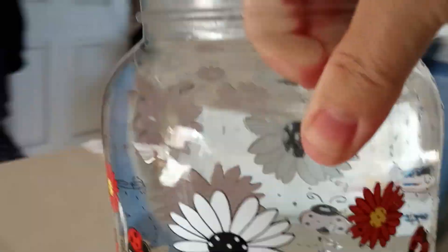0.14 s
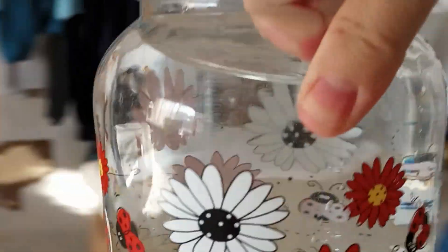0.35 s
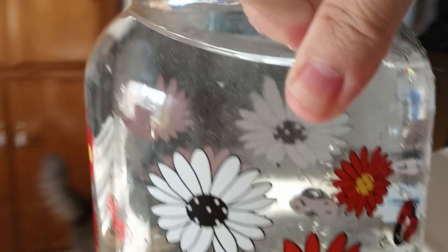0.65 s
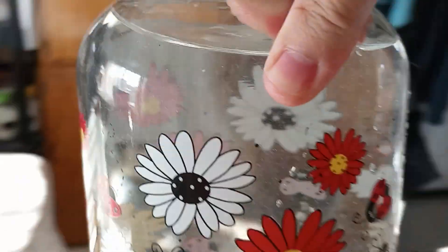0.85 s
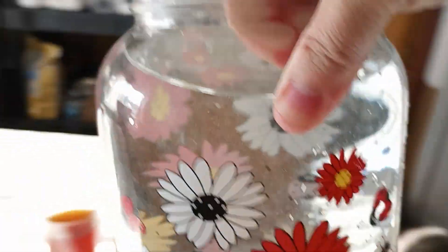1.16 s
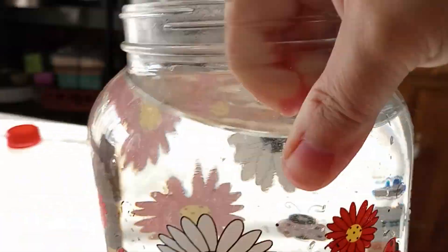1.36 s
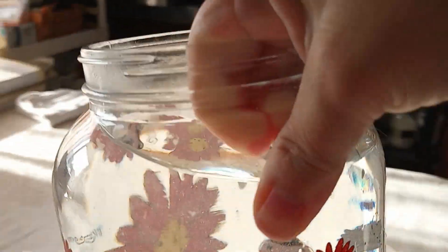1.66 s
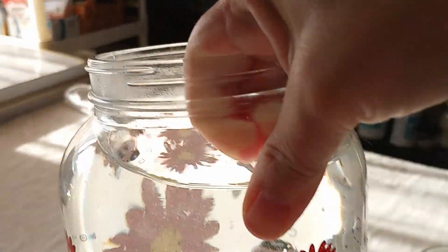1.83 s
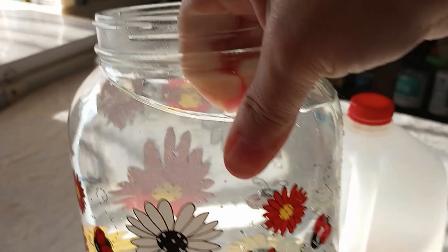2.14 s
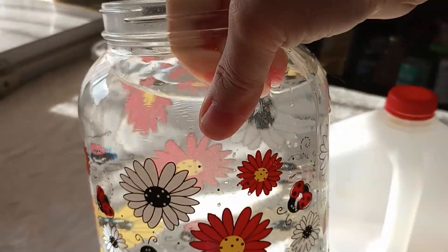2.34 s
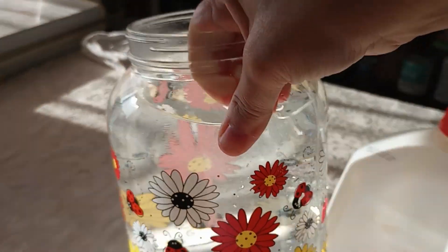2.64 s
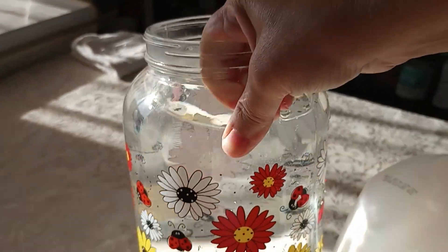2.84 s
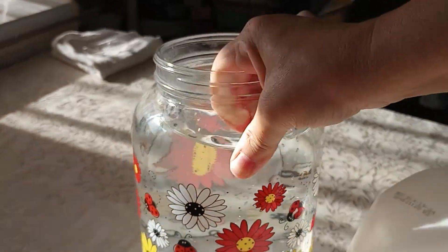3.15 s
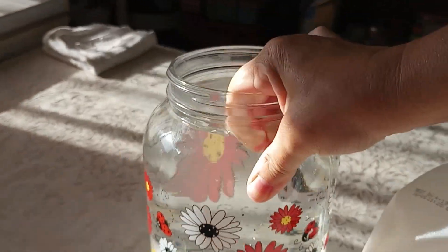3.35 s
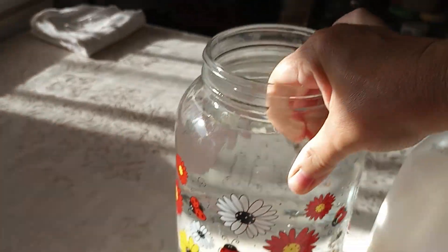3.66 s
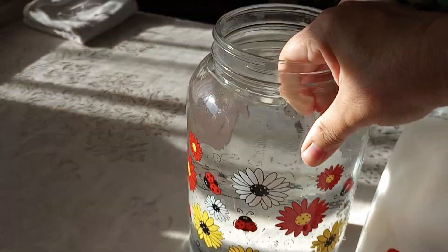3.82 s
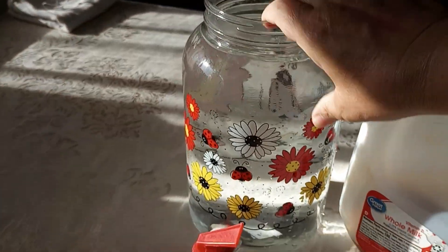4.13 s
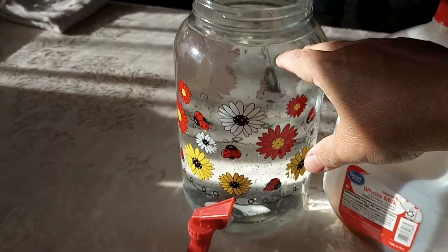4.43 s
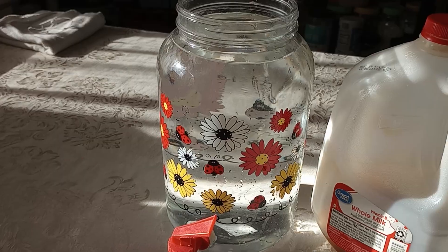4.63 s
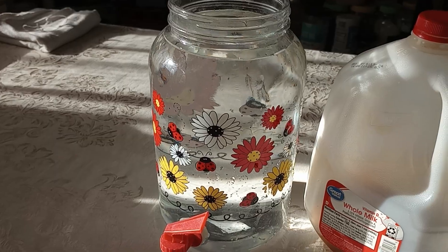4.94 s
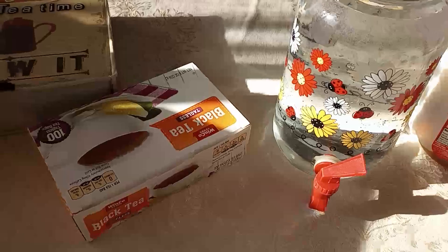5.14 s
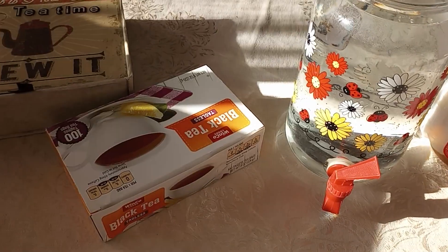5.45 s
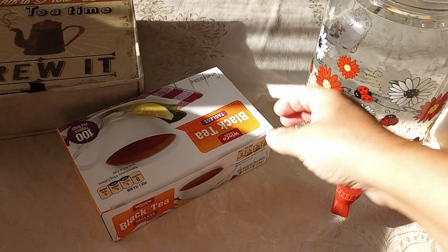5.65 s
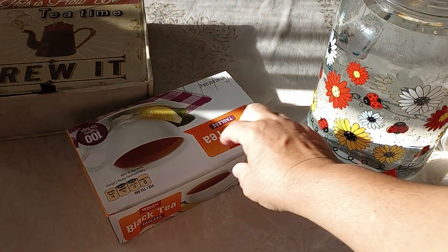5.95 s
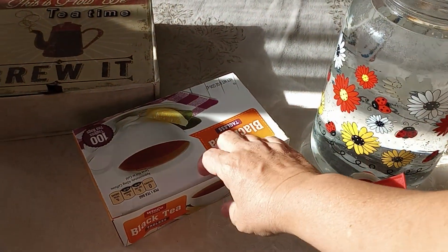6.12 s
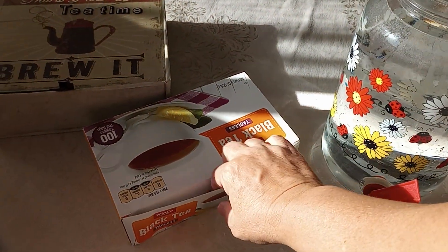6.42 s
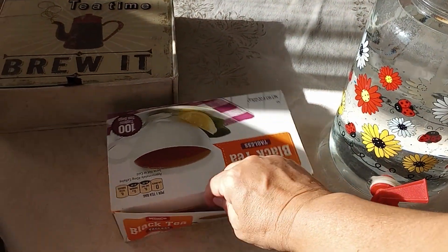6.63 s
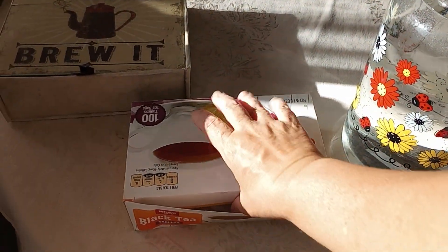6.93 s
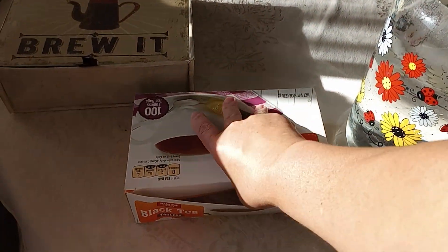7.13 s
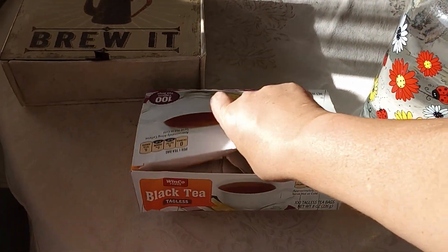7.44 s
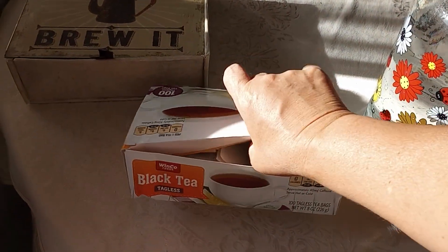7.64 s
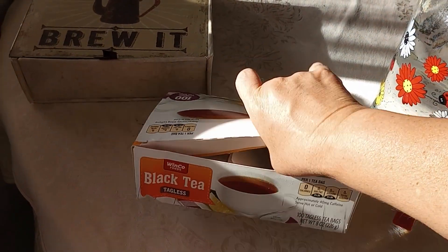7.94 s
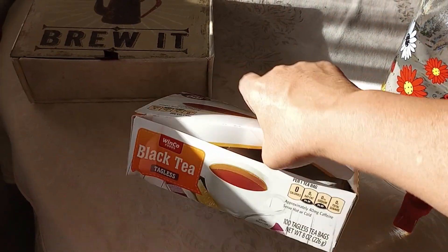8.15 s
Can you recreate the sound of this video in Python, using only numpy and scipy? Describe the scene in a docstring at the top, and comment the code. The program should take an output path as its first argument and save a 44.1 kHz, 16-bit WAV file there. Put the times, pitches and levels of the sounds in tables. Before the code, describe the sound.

Close phone sound in a small kitchen with low rumble and a faint thin whine. Water plops in a heavy glass jar as soles slap the floor. The jar thumps hard onto a table and rocks to rest in dull knocks. After a brief total silence, fingers tap a hollow cardboard box, drag it shuddering across the table, rustle its flap, and pop the lid loudly.

```python
"""Water plops in a big glass jar over a low rumble and a faint whine, as someone carries it across a
small kitchen with slapping soles. The jar thumps onto a table and settles; a short silence follows.
Then a hand drags a cardboard tea box over the table and pops its lid open. Blows are bursts of noise
that ring damped modes or filters, water is gliding sine tones, rubbing is a stream of random clicks,
and rumble and whine are filtered noise."""
import sys
import numpy as np
from scipy import signal
from scipy.fft import rfft, irfft
from scipy.io import wavfile
from scipy.ndimage import uniform_filter1d

SR = 44100
rng = np.random.default_rng(int(sys.argv[2]) if len(sys.argv) > 2 else 0)


def output_pcm(signal):
    """Save a mono or channel-first signal as 16-bit PCM at the path in sys.argv[1].

    Samples are clipped to [-1, 1] before scaling.
    """
    pcm = np.clip(np.atleast_2d(signal).T, -1, 1) * 32767
    wavfile.write(sys.argv[1], SR, np.round(pcm).astype(np.int16))


N = 365137
TIME = np.arange(N) / SR  # seconds since the start of the scene
AGE = TIME[:SR // 2]  # seconds since the start of one short sound

# spectrum of rubbed card and fine spray: (frequency [Hz], level [dB])
HISS_SPECTRUM = [(60, -55), (200, -29), (700, 1.5), (1400, 1.5), (2200, 2.5), (3000, 0.5), (4300, -3),
                 (6500, -10), (8500, -26), (11000, -23), (15000, -23.5)]
# spectrum of cracking card and the middle of a tick: (frequency [Hz], level [dB])
CRACK_SPECTRUM = [(60, -46), (200, 0.5), (700, 4), (1300, 6), (2100, 9), (3000, -1), (4300, 0),
                  (6500, -10.5), (8500, -17.5), (15000, -18)]
# spectrum of the treble in ticks, sizzle and cloth: (frequency [Hz], level [dB])
TREBLE_SPECTRUM = [(1500, -83), (4000, 7), (5500, 6), (8500, 0.5), (12000, -1.5), (15000, 10.5)]
# the box, its panels and the air inside, before a hand damps them:
# (frequency [Hz], level [dB], time to fade by 60 dB [s])
BOX_RESONANCES = [(225, -6.5, 0.2), (365.4, 3, 0.4), (434.7, 3, 0.14), (477, -3.5, 0.12), (529, 2.5, 0.088),
                  (587, 1.5, 0.023), (667, 5, 0.054), (810, 6, 0.028), (880, -4, 0.02), (1022, -1.5, 0.073),
                  (1216, -2, 0.053), (1400, -0.5, 0.0035), (1700, 6.5, 0.011)]


def amp(db):
    """Turn decibels into a gain."""
    return 10 ** (np.asarray(db) / 20)


def along(points, hz):
    """Read (frequency, value) points on a logarithmic frequency axis."""
    f, value = np.transpose(points)
    return np.interp(np.log(hz + 1), np.log(f), value)


def through(x, response):
    """Convolve a sound with a response, keeping its length."""
    full = signal.fftconvolve(np.atleast_2d(x), np.atleast_2d(response), axes=1)
    return full[:, :x.shape[-1]]


def colour(x, points):
    """Filter a sound to a spectrum of (frequency, dB) points without smearing it back in time."""
    size = 4096
    log_gain = np.log(amp(along(points, np.fft.rfftfreq(size, 1 / SR))))
    # folding the cepstrum onto its first half makes the filter causal
    cepstrum = irfft(log_gain)
    cepstrum[1:size // 2] *= 2
    cepstrum[size // 2 + 1:] = 0
    return through(x, irfft(np.exp(rfft(cepstrum))))


def noise(size):
    """White noise at two microphone ports: alike in the bass, unrelated in the treble."""
    # how alike the ports hear sound from all around: (frequency [Hz], correlation [0 to 1])
    likeness = [(200, 0.91), (400, 0.69), (750, 0.071), (1400, 0)]
    mid, side = rfft(rng.standard_normal((2, size)))
    alike = np.clip(along(likeness, np.fft.rfftfreq(size, 1 / SR)), 0, 1)
    mid = mid * np.sqrt((1 + alike) / 2)
    side = side * np.sqrt((1 - alike) / 2)
    return irfft(np.array([mid + side, mid - side]), size)


def level(x, db):
    """Set the average (rms) level."""
    return x * amp(db) / np.sqrt(np.mean(x ** 2))


def peak(x, db):
    """Set the level of the loudest hundredth of a second."""
    power = np.mean(np.atleast_2d(x) ** 2, axis=0)
    smooth = uniform_filter1d(power, size=441, mode="constant")
    return x * amp(db) / np.sqrt(smooth.max())


def pan(x, left_db):
    """Lean a sound to the left (or, below zero, to the right)."""
    return x * amp(np.array([[left_db], [-left_db]]) / 2)


def add(track, s, sound):
    """Lay a sound into the track at time s."""
    start = int(np.clip(s * SR, 0, N - 1))
    track[:, start:start + sound.shape[-1]] += sound[..., :N - start]


def wander(count):
    """A slow random drift: straight lines between this many random points over the whole scene."""
    return np.interp(TIME, np.linspace(0, TIME[-1], num=count), rng.standard_normal(size=count))


def ring(modes, scatter_db=0., spread=0.):
    """Damped sine modes; each blow can weight them anew and shift the two ports out of step."""
    out = np.zeros((2, len(AGE)))
    for (hz, db, t60), (weight, lag) in zip(modes, rng.standard_normal((len(modes), 2))):
        # higher modes differ more between the ports
        shift = spread * lag * min(hz / 1000, 2) * np.array([[1], [-1]])
        fade = np.exp(-np.log(1000) * AGE / t60)
        out += amp(db + scatter_db * weight) * fade * np.sin(2 * np.pi * hz * AGE + shift)
    return out


def contact(fade_s, rise_s=0.0003, grit_db=4):
    """A dying cluster of micro-impacts as two rough surfaces meet."""
    # the strength jumps every 32 samples
    grit = np.repeat(rng.standard_normal(len(AGE)), 32)[:len(AGE)]
    envelope = np.exp(-AGE / fade_s) * (1 - np.exp(-AGE / rise_s))
    return noise(len(AGE)) * amp(grit_db * grit) * envelope


def slips(per_s, spread_db):
    """Stick-slip: clicks at random moments, of very unequal size."""
    happens = rng.random(N) < per_s / SR
    size = amp(spread_db * np.clip(rng.standard_normal(N), -2, 2))
    return happens * size * rng.choice([-1, 1], N)


def resonate(x, hz, boost_db, width=1.57):
    """Boost (or, below zero, dip) one main resonance among many weak ones that differ each time."""
    weak = np.column_stack([np.geomspace(600, 9000, num=48), 4.2 * rng.standard_normal(size=48)])
    return colour(colour(x, weak), [(hz / width, 0), (hz, boost_db), (hz * width, 0)])


def regrip(x, centre_hz, boost_db, octaves, patchy_db):
    """A moving grip shifts one strong resonance and, more slowly, reshuffles the weaker ones."""
    hz, s, frames = signal.stft(x, SR, nperseg=512)
    away = np.log2((hz[:, None] + 1) / np.interp(s, TIME, centre_hz)) / octaves
    patches = uniform_filter1d(rng.standard_normal(away.shape), size=3, axis=0)
    patches = uniform_filter1d(patches, size=27, axis=1)
    moved = frames * amp(boost_db * np.exp(-away ** 2) + patchy_db * patches / patches.std())
    # give each moment its old loudness back
    old_power = np.sum(abs(frames) ** 2, axis=(0, 1))
    new_power = np.sum(abs(moved) ** 2, axis=(0, 1)) + 1e-18
    return signal.istft(moved * np.sqrt(old_power / new_power), SR)[1][:, :N]


def stroke(start_s, rise_s, length_s):
    """Loudness curve of a rubbing movement: press, hold, let go."""
    age = TIME - start_s
    release_s = 0.013  # time constant of the letting go
    return np.clip(age / rise_s, 0, 1) * np.exp(-np.maximum(age - length_s, 0) / release_s)


def bumps(rows, body, rise_s, ring_db, thud_s, thud_trim_db, scuff_trim_db, scuff_rise_s=0.017):
    """Dull impacts: the ringing blow, a bass thud from what lies under it, and a slower scuff."""
    # bass thud of floor and table: (frequency [Hz], level [dB])
    thud_spectrum = [(30, -25), (70, -12), (130, 5), (180, 3), (260, -11.5), (450, -23), (2000, -87.5)]
    # scuff of rough surfaces: (frequency [Hz], level [dB])
    scuff_spectrum = [(500, 7), (1800, 6.5), (3000, 9.5), (4500, 6.5), (6500, 0), (8500, -21.5),
                      (15000, -15)]
    out = np.zeros((2, N))
    for s, db, thud_db, scuff_db, hz, fade_s in rows:
        blow = resonate(colour(contact(fade_s, rise_s), body), hz, ring_db)
        add(out, s, peak(blow, db))
        thud = colour(contact(thud_s, rise_s=0.0046, grit_db=1.5), thud_spectrum)
        thud = resonate(thud, 190, boost_db=8, width=1.02)  # floor and table boom at 190 Hz
        add(out, s, peak(thud, db + thud_db + thud_trim_db))
        scuff = resonate(colour(contact(fade_s, scuff_rise_s), scuff_spectrum), hz, ring_db)
        add(out, s, peak(scuff, db + scuff_db + scuff_trim_db))
    return out


def room_tone():
    """An uneven rumble under soft steady hiss, and a thin whine of noise that rings one narrow mode."""
    # spectrum of rumble and hiss: (frequency [Hz], level [dB])
    tone_spectrum = [(25, -15), (50, -11.5), (75, -2.5), (125, 1.5), (190, -1), (300, -15), (500, -20),
                     (1000, -27.5), (2500, -31.5), (6300, -37.5), (8500, -47.5), (13500, -47), (15000, -38)]
    # slow change of the rumble: (time [s], gain [dB])
    rumble_gain = [(0.7, -0.5), (3.3, -0.5), (3.7, -1.5), (4.3, -3.5), (4.6, -1), (5.3, 1)]
    # the whine comes and goes: (time [s], level before its random waver [dB])
    whine_level = [(0.2, -72), (0.35, -71), (1.0, -67), (1.3, -76), (1.95, -67.5), (2.7, -75), (2.97, -67),
                   (3.42, -68), (3.7, -80), (5.22, -75), (6.0, -83)]
    whine_hz, whine_waver_db = 2910, 2.5
    rumble_top_hz, rumble_waver_db = 300, 3.0
    whine = through(noise(N), ring([(whine_hz, 0, .09)])) * amp(whine_waver_db * wander(count=80))
    whine = level(whine, 0) * amp(np.interp(TIME, *np.transpose(whine_level)))
    tone = level(colour(noise(N), tone_spectrum), -47)
    low_pass = signal.butter(2, rumble_top_hz, fs=SR, output="sos")
    rumble = signal.sosfiltfilt(low_pass, tone)
    swell = amp(np.interp(TIME, *np.transpose(rumble_gain)) + rumble_waver_db * wander(count=90))
    return pan(tone - rumble + swell * rumble, 1.0) + whine


def water():
    """A wavelet traps a bubble, whose pitch climbs as it rises; droplets fall back just after."""
    # plops in the jar: (time [s], starting pitch [Hz], relative level [dB],
    # time to fade by 60 dB [s], spray relative to bubble before trims [dB])
    plops = [(0.02, 1490, -29, 0.1, -22), (0.022, 3320, -47.5, 0.065, -24), (0.044, 2240, -52, 0.11, -1.5),
             (0.021, 1120, -31, 0.054, -36), (0.486, 705, -32, 0.096, -18.5), (0.503, 720, -30, 0.059, -18),
             (0.85, 783, -37, 0.23, -13), (0.858, 528, -34, 0.18, -19), (1.349, 798, -46, 0.15, -17),
             (2.579, 980, -54, 0.16, -29), (3.711, 1370, -40.5, 0.052, -27),
             (3.712, 3470, -52.5, 0.056, -6), (3.784, 947, -50.5, 0.17, -11), (4.603, 948, -42, 0.11, -41)]
    glide = 0.51  # half the share of the starting pitch by which the pitch climbs per second
    swell = 0.0055  # rise as a share of the fade time
    spray_lag_s, spray_s = 0.016, 0.021
    out = np.zeros((2, N))
    for s, hz, db, t60, spray_db in plops:
        fade = np.exp(-np.log(1000) * AGE / t60) * (1 - np.exp(-AGE / (swell * t60)))
        bubble = np.sin(2 * np.pi * hz * (AGE + glide * AGE ** 2)) * fade
        # lapping water: noise around the bubble's pitch
        lap_spectrum = [(hz / 2, -22), (hz * 0.612, -2), (hz * 1.114, 0),
                        (hz * 1.49, -17), (hz * 2, -30), (hz * 6, -55)]
        lap = colour(contact(t60 / 5, swell * t60), lap_spectrum)
        add(out, s, peak(bubble, db - 5) + peak(lap, db - 4.5))
        spray = colour(contact(spray_s, rise_s=0.0013, grit_db=0.0), HISS_SPECTRUM)
        add(out, s + spray_lag_s, peak(spray, db + spray_db))
    return out


def footsteps():
    """Soles slap the floor, heels thud through it, and shoes scuff."""
    # footfalls and scuffs: (time [s], relative slap level [dB], heel thud relative to slap before trim [dB],
    # scuff relative to slap before trim [dB], main resonance [Hz], contact time constant [s])
    steps = [(0.732, -50, -17, 10.5, 650, 0.0058), (1.056, -29.5, -0.5, -12.5, 1020, 0.043),
             (1.485, -34.5, 2, -8, 930, 0.078), (1.531, -24, 8, -11, 428, 0.021),
             (1.605, -39, -7, -20, 440, 0.014), (1.651, -27, -10, -9.5, 470, 0.026),
             (1.725, -34.5, -7, -8.5, 910, 0.021), (2.114, -34.5, 8.5, 1, 895, 0.028),
             (2.182, -41, 2.5, -12, 750, 0.0077), (2.502, -45.5, 11.5, 12, 2700, 0.011)]
    # spectrum of a sole on the floor: (frequency [Hz], level [dB])
    slap_spectrum = [(100, -6), (300, 1), (550, -1.5), (1000, -13), (1900, -11), (3200, -16.5),
                     (7000, -43.5)]
    return bumps(steps, slap_spectrum, rise_s=0.0011, ring_db=8.0,
                 thud_s=0.035, thud_trim_db=0.5, scuff_trim_db=-4.5)


def swishes():
    """A faint high swish with the strides, as cloth brushes on cloth: treble noise in soft strokes."""
    # brushes of cloth: (start [s], length before letting go [s], relative level [dB])
    brushes = [(0.827, 0.089, -51.5), (1.055, 0.1, -59.5), (1.499, 0.088, -49.5), (2.12, 0.036, -50)]
    cloth = level(colour(noise(N), TREBLE_SPECTRUM), 0)
    return cloth * sum(amp(db) * stroke(s, 0.021, length_s) for s, length_s, db in brushes)


def smacks():
    """The short, hard first contact of a flat sole: a gritty burst of noise."""
    # flat landings: (time [s], relative level [dB], centre of a slight spectral dip [Hz])
    landings = [(1.056, -31, 1030), (1.5294, -30, 1650), (2.113, -30, 1180)]
    smack_spectrum = [(400, -20), (950, 9), (2600, -6), (4200, -26), (9000, -49)]
    out = np.zeros((2, N))
    for s, db, hz in landings:
        smack = colour(contact(0.0045, rise_s=0.00047, grit_db=6), smack_spectrum)
        add(out, s, peak(resonate(smack, hz, boost_db=-2, width=1.6), db))
    return out


def table_thump(push_s):
    """A soft push rings the modes of the table top, which radiates little deep bass."""
    # the table under the jar: (frequency [Hz], level [dB], time to fade by 60 dB [s])
    table_modes = [(115, -7, 0.57), (174, 13, 0.045), (192.6, -1, 0.14), (231, 2.5, 0.052),
                   (295, -17, 0.41), (487, -18, 0.19), (602, -22, 0.2), (703, -19.5, 0.21),
                   (710, -22.5, 0.08), (823, -21.5, 0.14)]
    pushed = ring(table_modes, spread=0.22) * (1 - np.exp(-AGE / push_s))
    return colour(pushed, [(30, -15), (90, 0.5), (150, -1.0)])


def jar():
    """The heavy jar rings the table top; the glass clacks, damped by its water."""
    # the base meets the table, edge first: (time [s], relative thump level [dB],
    # clack relative to thump [dB], contact time constant [s])
    landings = [(3.011, -1, -20.5, 0.0071), (3.016, -16, 2.5, 0.0035), (3.0323, -8, -22.5, 0.039)]
    # spectrum of the glass: (frequency [Hz], level [dB])
    clack_spectrum = [(50, -18.5), (150, -7.5), (500, 18), (1100, 4), (1900, 4.5), (4300, 1), (6500, -9.5),
                      (8500, -21.5), (15000, -30)]
    out = np.zeros((2, N))
    for s, db, clack_db, fade_s in landings:
        add(out, s, peak(table_thump(push_s=0.00057), db))
        clack = colour(contact(fade_s, rise_s=0.00079, grit_db=2.0), clack_spectrum)
        add(out, s, peak(clack, db + clack_db))
    return pan(out, 0.7)


def settling():
    """The jar rocks to rest in dull knocks and scrapes, then the hand lets go of the glass."""
    # knocks: (time [s], relative level [dB], scrape relative to knock before trim [dB], main resonance [Hz])
    knocks = [(3.085, -24, -23, 520), (3.119, -32.5, -19, 403), (3.161, -30, -25.5, 407),
              (3.174, -39.5, -28, 520), (3.212, -30.5, -28, 330), (3.227, -44, -24, 560),
              (3.24, -41, -18, 520), (3.2912, -29.5, -23.5, 320), (3.462, -26, -18, 445),
              (3.643, -36.5, -24.5, 1740), (3.841, -50, 0.5, 1610), (4.434, -57, 3.5, 4560),
              (4.496, -61.5, 5, 4600), (4.574, -44.5, -11.5, 3650)]
    # spectrum of a knock: (frequency [Hz], level [dB])
    knock_spectrum = [(100, -24.5), (280, 3), (430, 6.5), (750, -1), (1500, -8), (2600, -14), (8000, -76)]
    # the same glass on the same table: one thud level relative to the knock and one contact time
    thud_db, contact_s = -9.0, 0.017
    rows = [(s, db, thud_db, scrape_db, hz, contact_s) for s, db, scrape_db, hz in knocks]
    return bumps(rows, knock_spectrum, rise_s=0.00076, ring_db=6.5, thud_s=0.025,
                 thud_trim_db=0, scuff_trim_db=8.5, scuff_rise_s=0.00047)


def ticks():
    """Tiny hard contacts of nail, glass and card close to the phone: short bursts of noise."""
    # sharp ticks: (time [s], relative treble level [dB], mid-range relative to treble [dB],
    # contact time constant [s], left minus right [dB])
    tick_rows = [(3.092, -33.5, -26, 0.0037, -3), (3.755, -45.5, -23, 0.0027, 4),
                 (4.219, -50.5, 13, 0.0034, 3), (5.614, -38.5, -21, 0.014, 0.5),
                 (7.2052, -42.5, 18, 0.0026, 1), (7.393, -43, 0, 0.0011, 6), (7.528, -38.5, -2, 0.0033, -6),
                 (7.8324, -34.5, 4, 0.0057, 0), (8.103, -50, 14.5, 0.0025, -4),
                 (8.142, -26.5, 1.5, 0.0028, -1.5)]
    out = np.zeros((2, N))
    for s, db, mid_db, fade_s, left_db in tick_rows:
        treble = peak(colour(contact(fade_s), TREBLE_SPECTRUM), db)
        middle = peak(colour(contact(fade_s), CRACK_SPECTRUM), db + mid_db)
        add(out, s, pan(treble + middle, left_db))
    return out


def box_taps():
    """Blows ring the hollow box and crack its stiff card; low thuds from the table accompany some."""
    # fingers and lid strike the box: (time [s], relative body level [dB],
    # crack relative to body before trims [dB], main resonance [Hz])
    taps = [(5.833, -33.5, -7.5, 980), (5.975, -26.5, -11.5, 890), (6.038, -33.5, -4, 450),
            (6.088, -27.5, -8, 990), (6.119, -35.5, -6, 810), (6.182, -17, -38, 437),
            (6.41, -13.5, -22, 376), (6.433, -14.5, -16.5, 408), (6.499, -14.5, -8.5, 476),
            (6.559, -24.5, -28, 460), (6.61, -24, -26, 353), (7.205, -20, -27, 365), (7.386, -33, 0, 860),
            (7.812, -39, -22, 760), (7.966, -5, -3.5, 480), (7.978, -4, -11, 877), (7.989, -9.5, -31, 387)]
    # low thuds in the table: (time [s], relative level [dB], extra damping time constant [s])
    low_thuds = [(5.839, -33.5, 0.24), (6.5, -20, 0.048), (7.974, -8, 0.0043)]
    body_trim_db, crack_trim_db, thud_trim_db = -2, -1, -2
    contact_s, rise_s = 0.0039, 0.0024
    held_s = 0.022  # the hand shortens the box's ring
    out = np.zeros((2, N))
    for s, db, crack_db, hz in taps:
        # soft fingers excite few high modes
        treble_db = np.clip(crack_db - 19.0, -30, 0)
        push_spectrum = [(60, -24), (200, -7.5), (600, 8.5), (1100, -2.0), (2500, treble_db), (8000, -1.0)]
        push = colour(contact(contact_s, rise_s, grit_db=-0.5)[0], push_spectrum)
        held_box = ring(BOX_RESONANCES, scatter_db=0.63, spread=0.49) * np.exp(-AGE / held_s)
        body = resonate(through(push, held_box), hz, boost_db=11.5, width=1.215)
        add(out, s, pan(peak(body, db + body_trim_db), 1.7))
        crack = colour(contact(contact_s, rise_s, grit_db=2.5), CRACK_SPECTRUM)
        add(out, s, peak(resonate(crack, hz, boost_db=7), db + crack_db + crack_trim_db))
    # thinner in the bass than the jar's thump
    thud = colour(table_thump(push_s=0.012), [(150, -15), (225, -10)])
    for s, db, damped_s in low_thuds:
        add(out, s, pan(peak(thud * np.exp(-AGE / damped_s), db + thud_trim_db), 0.94))
    return out


def rubbing():
    """Drag and strokes as gains of shudder, hiss and sizzle, plus shudder pitch and panel resonance."""
    # the box is dragged round on the table: (time [s], shudder level [dB], hiss level [dB],
    # treble sizzle level [dB], shudder pitch [Hz]), levels relative
    drag = [(6.25, -47.5, -56, -54.5, 480), (6.397, -40, -49, -47, 620), (6.411, -27, -38.5, -44, 420),
            (6.47, -24, -32, -34, 436), (6.53, -33, -35.5, -62, 420), (6.55, -41, -45, -62, 420),
            (6.574, -21.5, -42, -58, 433), (6.63, -27, -35, -55, 550), (6.68, -32.5, -41, -48, 570),
            (6.735, -33, -40, -57, 474), (6.815, -26.5, -37.5, -54, 470), (6.865, -30.5, -39, -46, 460),
            (6.904, -32.5, -36, -38, 480), (6.958, -39.5, -45.5, -69, 604), (7.025, -58, -55, -72, 500)]
    # fingers and flap over the card: (start [s], rise [s], length before letting go [s],
    # shudder level [dB], hiss level [dB], shudder pitch [Hz], panel resonance [Hz]), levels relative
    strokes = [(5.935, 0.043, 0.036, -29.5, -40, 845, 1870), (6.122, 0.017, 0.044, -40.5, -47, 630, 2870),
               (6.174, 0.014, 0.046, -41, -44.5, 590, 2980), (7.071, 0.044, 0.16, -35, -39, 800, 2050),
               (7.186, 0.017, 0.061, -39, -36, 370, 2110), (7.253, 0.014, 0.069, -36, -42.5, 696, 1930),
               (7.377, 0.024, 0.034, -29, -33, 940, 3700), (7.416, 0.029, 0.092, -41, -42, 605, 2200),
               (7.53, 0.021, 0.059, -39, -36.5, 610, 2270), (7.593, 0.036, 0.089, -37.5, -34, 850, 2270),
               (7.713, 0.054, 0.077, -32.5, -37, 920, 1500), (7.792, 0.012, 0.058, -27.5, -30.5, 545, 3930),
               (7.93, 0.014, 0.12, -29, -31, 730, 1900), (8.103, 0.011, 0.053, -35, -36.5, 590, 2780),
               (8.154, 0.032, 0.098, -41, -40.5, 753, 2100)]
    edge_s = 0.072  # the drag fades in and out over this time
    drag_panel_hz = 1390  # panel resonance while the box slides
    s, *columns = np.transpose(drag)
    sliding = np.clip(1 + np.minimum(TIME - s[0], s[-1] - TIME) / edge_s, 0, 1)
    low_db, mid_db, top_db, drag_hz = (np.interp(TIME, s, column) for column in columns)
    body = sliding * amp(low_db) + 1e-9
    hiss = sliding * amp(mid_db) + 1e-9
    skating = sliding * amp(top_db)
    # where movements overlap, frequencies are means weighted by gain
    pitch_sum = body * drag_hz
    panel_sum = hiss * drag_panel_hz
    for start_s, rise_s, length_s, shudder_db, hiss_db, hz, panel_hz in strokes:
        pressure = stroke(start_s, rise_s, length_s)
        body = body + pressure * amp(shudder_db)
        pitch_sum = pitch_sum + pressure * amp(shudder_db) * hz
        hiss = hiss + pressure * amp(hiss_db)
        panel_sum = panel_sum + pressure * amp(hiss_db) * panel_hz
    return body, hiss, skating, pitch_sum / body, panel_sum / hiss


def box_rubs():
    """Coarse slips shudder through the box's modes; fine ones hiss off the card's fibres."""
    body, hiss, skating, pitch_hz, panel_hz = rubbing()
    surge = amp(1.5 * wander(count=500))  # the card catches and gives
    coarse = slips(per_s=1700, spread_db=2.5) * surge
    # the hand damps the panels
    held_box = ring(BOX_RESONANCES, spread=0.36) * np.exp(-AGE / 0.0079)
    shudder_spectrum = [(50, -30.0), (120, -5), (220, -2.5), (330, 4), (900, 8.0), (2500, -3.0), (8000, -47)]
    shudder = colour(through(coarse, held_box), shudder_spectrum)
    shudder = regrip(shudder, pitch_hz, boost_db=7, octaves=0.36, patchy_db=2.2)
    fine = np.array([slips(per_s=3000, spread_db=6) for _ in range(2)])
    # fibres crackle most just after each slip
    catch = through(np.abs(coarse), np.exp(-AGE / 0.067))
    crackle = level(fine * (-0.5 + level(catch, 0)), 0)
    # bending card snaps now and then
    creases = through(slips(per_s=70, spread_db=7.5), contact(0.001, rise_s=0.0001))
    fibres = colour(crackle + level(creases, -7), HISS_SPECTRUM)
    # the panel's resonance shifts with the fingers, by about 0.16 octaves
    panel_hz = panel_hz * 2 ** (0.16 * wander(count=140))
    fibres = regrip(fibres, panel_hz, boost_db=6, octaves=.22, patchy_db=3.2)
    # the underside skates on the table
    sizzle = skating * level(colour(fine, TREBLE_SPECTRUM), 0)
    return pan(body * level(shudder, 0), 1.8) + pan(hiss * level(fibres, 0) + sizzle, -0.28)


def judders():
    """For a moment the slips fall into step and the box gives a short hoot: an unsteady tone and octave."""
    # grip and slip in rhythm: (time [s], mean slips per second [Hz], relative level [dB], length [s])
    hoots = [(6.812, 450, -23.5, 0.042), (6.966, 342, -31, 0.035), (7.859, 279, -25, 0.027),
             (7.902, 415, -22, 0.027)]
    out = np.zeros((2, N))
    for s, hz, db, length_s in hoots:
        pace = 1 + .07 * level(uniform_filter1d(rng.standard_normal(len(AGE)), size=150), 0)
        phase = 2 * np.pi * np.cumsum(hz * pace) / SR
        grip = amp(3 * level(uniform_filter1d(rng.standard_normal(len(AGE)), size=200), 0))
        swell = grip * np.sin(np.pi * np.clip(AGE / length_s, 0, 1)) ** 2
        hoot = np.sin(phase) + amp(-11) * np.sin(2 * phase)
        add(out, s, peak(swell * hoot, db + 1.0))
    return pan(out, 2.4)


def kitchen(x, wet_db):
    """Direct sound plus a dense echo from near walls: fading noise, thin in the bass."""
    # how long the echo lasts: (frequency [Hz], time to fade by 60 dB [s])
    echo_t60 = [(100, 0.43), (400, 0.13), (1500, 0.16), (5000, 0.15), (15000, 0.2)]
    first_s = 0.003  # no echo before this; full echo at twice this
    hz, s, frames = signal.stft(noise(len(AGE)), SR, nperseg=256)
    fade = np.exp(-np.log(1000) * s / along(echo_t60, hz)[:, None])
    tail = signal.istft(frames * fade, SR)[1][:, :len(AGE)]
    tail = tail * np.clip(AGE / first_s - 1, 0, 1)
    tail = colour(tail, [(150, -15.0), (600, -0.5), (1200, -3.0)])
    return x + amp(wet_db) * through(x, tail / np.sqrt(np.sum(tail ** 2) / 2))


def scene():
    """Mix the sources, each group with its own share of echo, over the room's own tone."""
    walking = amp(-4.0) * footsteps() + amp(-1.5) * smacks()
    far = kitchen(walking + amp(-5.0) * settling(), wet_db=-2.0)
    near = kitchen(water() + ticks() + swishes(), wet_db=-7.0)
    set_down = kitchen(jar(), wet_db=-1.0)
    box = kitchen(box_taps() + box_rubs() + judders(), wet_db=-3.5)
    return room_tone() + near + far + set_down + box


def record(dry):
    """The phone thins the bass, its two ports differ a little, loud peaks clip, and one gap is silent."""
    # response of the microphone: (frequency [Hz], gain [dB])
    mic_response = [(20, -30.5), (40, -8), (70, -6), (13800, -1)]
    # difference between the ports: (frequency [Hz], left minus right [dB])
    port_balance = [(60, -0.5), (300, 1.5), (1000, 0), (2000, -0.5), (6000, -0.5), (14000, -3.5)]
    # the silent gap: (start [s], end [s])
    gap = (4.7143, 5.0322)
    top_hz = 15750  # nearly nothing passes above this
    balance_db = along(port_balance, np.fft.rfftfreq(N, 1 / SR))
    port_gain = amp(np.array([[.5], [-.5]]) * balance_db)
    ports = irfft(rfft(colour(dry, mic_response)) * port_gain, N)
    running = (TIME < gap[0]) | (TIME > gap[1])
    sound = np.clip(ports, -1, 1) * running
    return signal.sosfilt(signal.ellip(10, .2, 70, top_hz, fs=SR, output="sos"), sound)


dry = scene()
out = record(dry)
output_pcm(out)
```